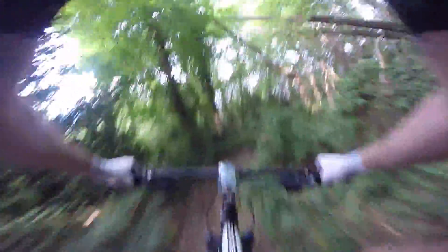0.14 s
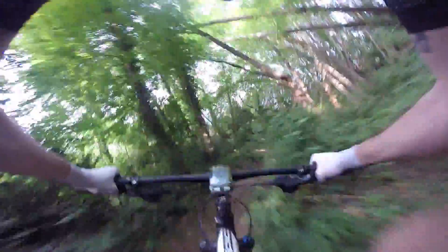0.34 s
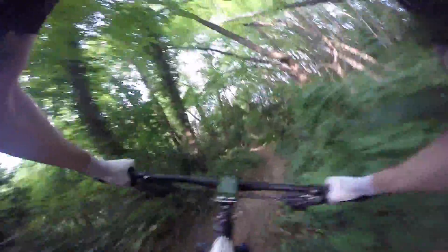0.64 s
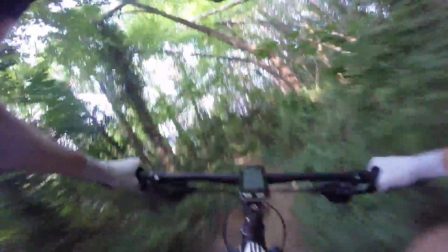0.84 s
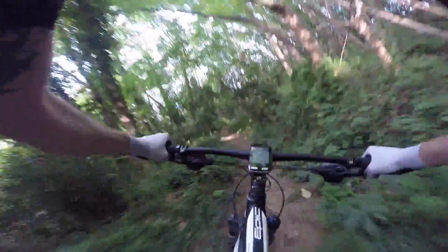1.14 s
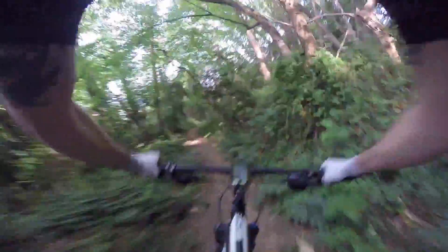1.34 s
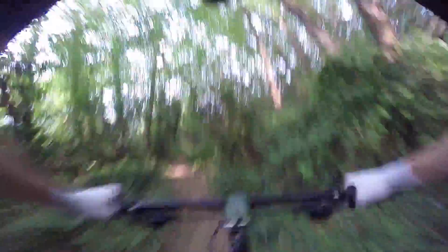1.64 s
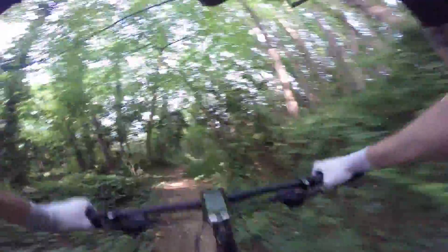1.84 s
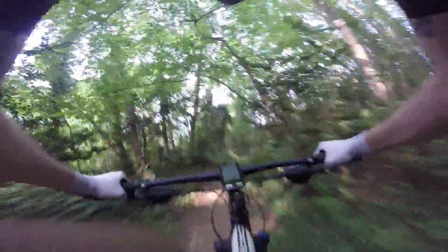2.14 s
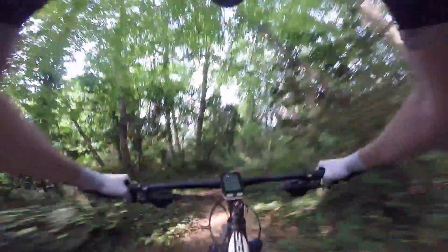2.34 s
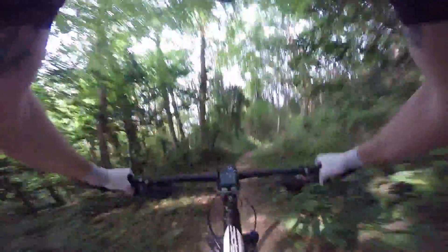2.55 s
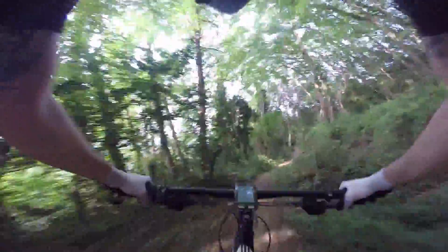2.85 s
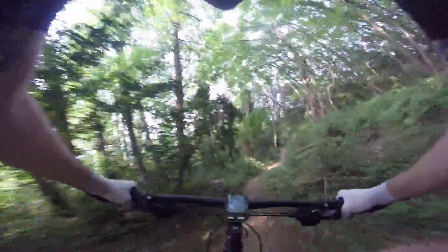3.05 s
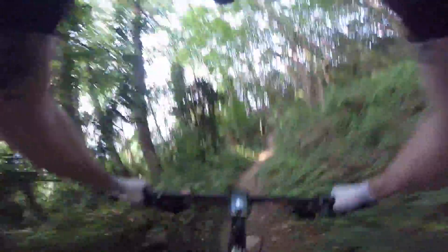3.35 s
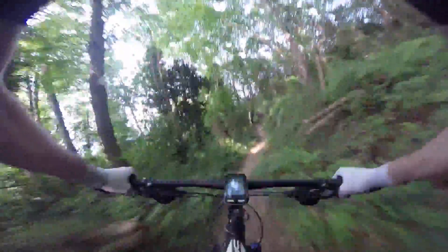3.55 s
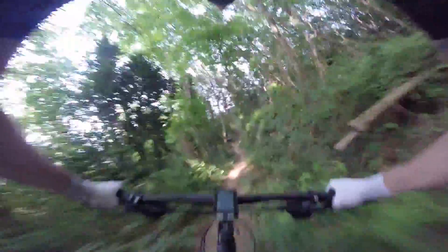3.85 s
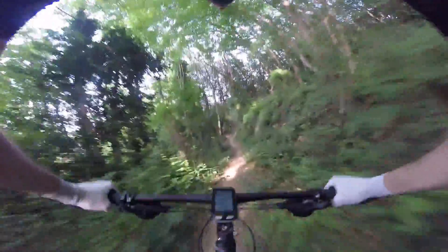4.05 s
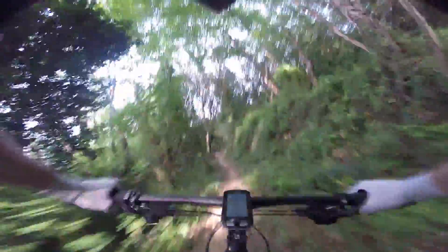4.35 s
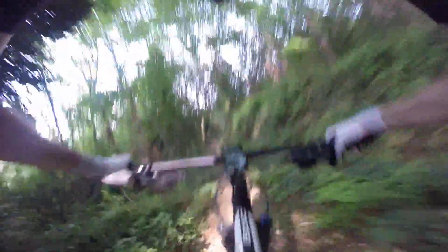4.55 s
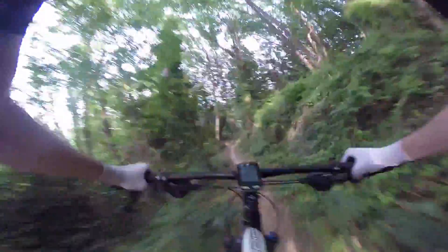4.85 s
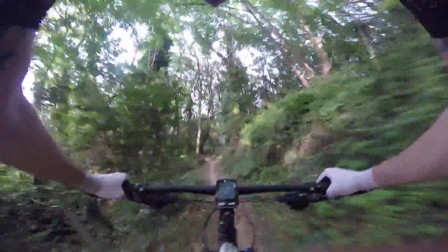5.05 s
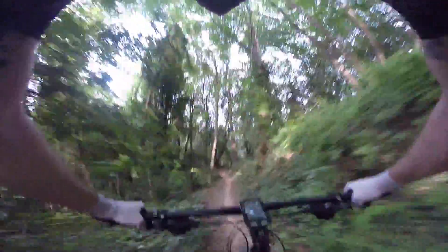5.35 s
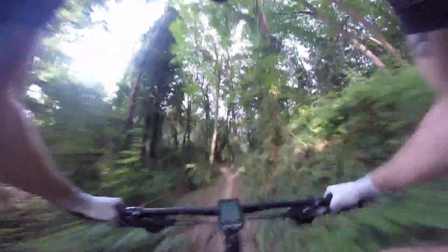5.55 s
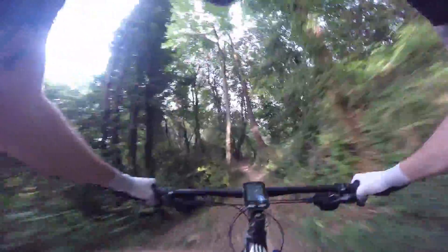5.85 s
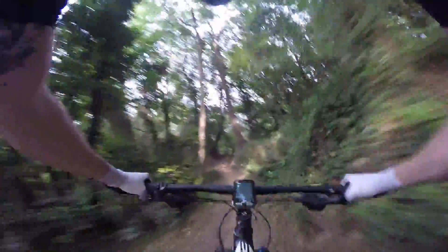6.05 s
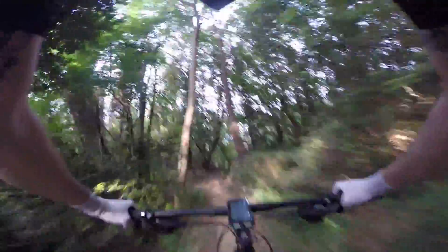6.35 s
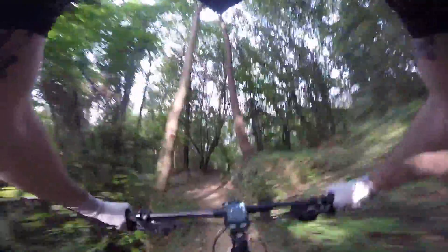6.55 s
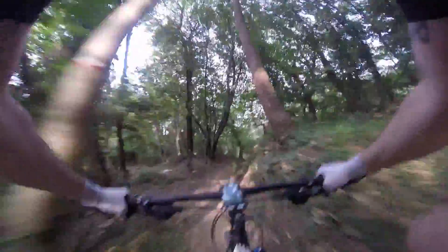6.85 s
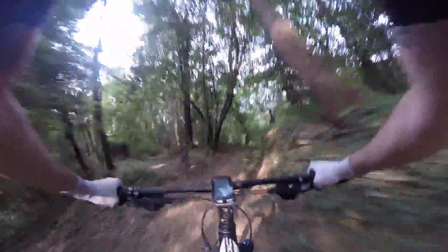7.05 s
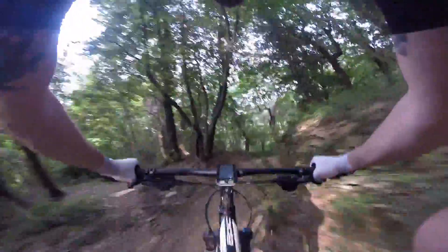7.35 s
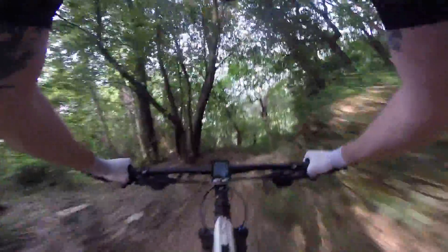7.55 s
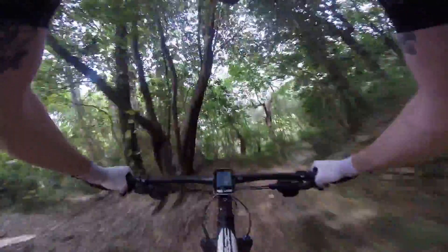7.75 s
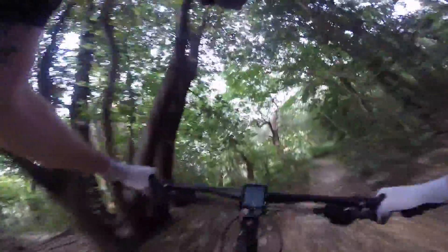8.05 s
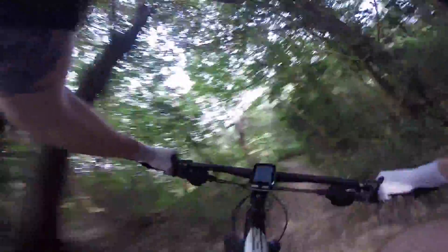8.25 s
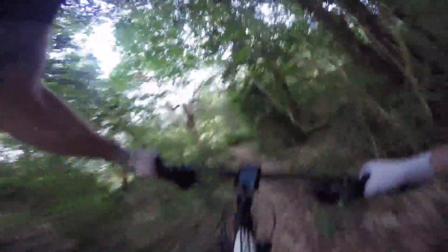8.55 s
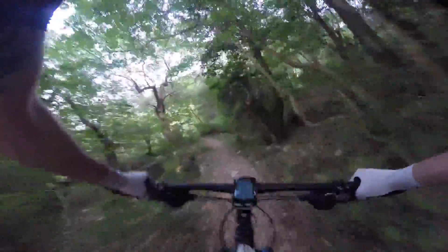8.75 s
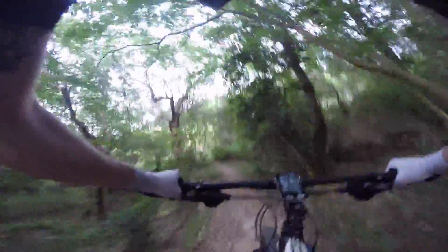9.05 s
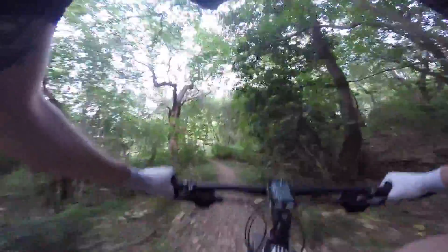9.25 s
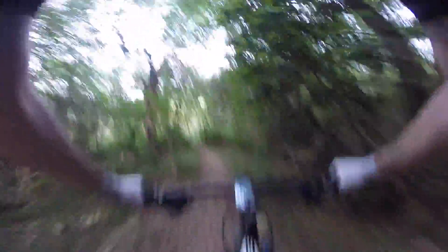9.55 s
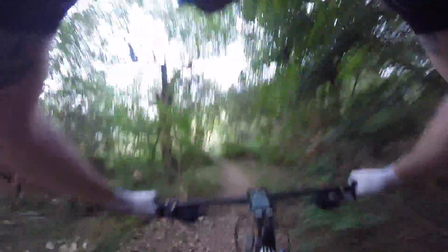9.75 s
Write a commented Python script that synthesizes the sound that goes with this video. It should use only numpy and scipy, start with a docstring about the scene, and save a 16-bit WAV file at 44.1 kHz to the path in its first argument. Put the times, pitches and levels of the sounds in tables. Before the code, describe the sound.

A mountain bike speeds along a rough woodland dirt trail, heard from the rider's chest. Low ground rumble and gusty wind buffet the microphone throughout, over a gritty tyre hiss and hollow roll. Short hollow knocks come irregularly, with sharp plastic ticks and creaks close by, busiest in the first few seconds. The middle turns smoother and windier, then a hard landing clanks the frame near the end.

```python
"""A rough woodland trail, ridden fast on a mountain bike; the microphone is on a mount on the rider's chest.
Wind and ground shake are filtered noise; the tyres rumble and crunch as random clicks and noise through resonances.
The bike knocks and once clanks as short blows ring its modes.
Close to the microphone the plastic mount ticks and creaks as its joints slip."""
import sys
import numpy as np
from scipy import signal
from scipy.io import wavfile
from scipy.ndimage import uniform_filter1d, minimum_filter1d

SR = 44100
rng = np.random.default_rng(int(sys.argv[2]) if len(sys.argv) > 2 else 0)


def generate_wav(sig):
    """Save sig (samples, or channels by samples) to the path in sys.argv[1] as 16-bit PCM at SR."""
    pcm = np.round(np.clip(np.atleast_2d(sig).T, -1, 1) * 32767).astype(np.int16)
    wavfile.write(sys.argv[1], SR, pcm)


N = 437031  # length in samples
CONTROL_STEP = 40  # samples between points of the slow control curves

# All table levels are relative, ahead of the trims in the functions.
# how hard the ground shakes the rider: (time [s], level [dB])
SHAKE = [(0.0, -1.5), (0.02, -19.5), (0.82, -22.5), (1.41, -20), (1.87, -26), (2.43, -18), (4.11, -17),
         (4.44, -24), (4.86, -16.5), (4.97, -18.5), (8.44, -18.5), (8.55, -20), (9.6, -18), (9.91, -20.5)]
# heavy sinks of the bike into a dip: (time [s], rumble level [dB])
HEAVES = [(0.16, -14), (1.05, -11.5), (1.43, -13), (1.95, -33), (2.83, -4.5), (3.52, -7), (4.25, -12),
          (4.669, -7), (4.79, -5), (4.89, -6), (5.45, -17), (5.93, -10), (6.44, -12), (7.66, -18),
          (9.25, -11)]
# brief dips of the low rumble, a negative depth being a lift: (time [s], depth [dB])
LULLS = [(0.52, 3), (0.96, 6), (1.85, 14), (2.67, -5), (4.17, 6), (4.48, 5), (5.53, 12), (5.8, -1.5),
         (6.73, 6), (7.18, 2), (8.58, 12), (9.69, -1)]
# the bike goes light over a crest and the noise drops: (time [s], depth [dB])
CRESTS = [(0.08, 5), (1.6, 7), (1.86, 1.5), (2.03, 9), (2.25, 5.5), (6.31, 7), (6.36, 2), (6.49, 2.5),
          (8.75, 5.5), (8.85, 10)]
HEAVE_S, LULL_S, CREST_S = 0.026, 0.024, 0.022  # half-widths of the bells, at 1/e
SHAKE_GAIN_DB, GUST_RUMBLE_DB = 4, -12  # rumble from the shake and from the gusts
# spectrum of the ground rumble: (frequency [Hz], density [dB per Hz])
RUMBLE_SPECTRUM = [(15, -5), (28, -4.5), (50, -0.5), (85, -2.5), (120, -5), (180, -20), (300, -31.5),
                   (600, -33)]

# gusts at the microphone: (start [s], length [s], level [dB])
GUSTS = [(0.093, 0.32, -13), (0.552, 0.28, -15), (1.03, 0.44, -16.5), (1.393, 0.055, -7.5),
         (2.274, 0.23, -8), (2.61, 0.23, -10), (2.857, 0.35, -6), (3.232, 0.6, -9.5), (3.79, 0.14, -11.5),
         (4.01, 0.049, -10.5), (4.194, 0.64, -13.5), (4.728, 0.051, -14), (4.831, 0.23, -5.5),
         (5.223, 0.1, -9.5), (5.385, 0.41, -6), (5.812, 0.393, -6), (6.52, 0.61, -8.5),
         (7.308, 0.064, -9.5), (7.881, 0.38, -10), (9, 0.39, -6.5), (9.412, 0.23, -15), (9.689, 0.47, -6)]
GUST_ATTACK_S, GUST_SAG_DB_PER_S, GUST_RELEASE_DB_PER_S = 0.06, 15, 215
BREEZE_DB = -1.5  # the air between gusts, relative to the shake
# spectrum of the wind before it brightens: (frequency [Hz], density [dB per Hz])
GUST_SPECTRUM = [(70, -12), (120, 1), (170, 2), (260, -2.5), (400, -8), (600, -15), (1000, -26.5),
                 (1400, -41), (2500, -43), (5000, -104)]

# hollow roll of the tyres on hard ground: (time [s], level [dB])
ROLL_LEVEL = [(0.0, -36), (1.02, -30.5), (1.74, -34), (4.53, -31), (5.11, -37), (5.93, -30.5), (6.4, -35),
              (6.65, -35.5), (7.67, -37), (8.47, -26.5), (8.83, -31.5), (9.19, -30.5), (9.63, -31.5),
              (9.91, -23.5)]
# loose grit under the tyres, thinning out on the packed stretch: (time [s], level [dB])
GRIT_LEVEL = [(0.0, -40.5), (0.58, -42), (0.7, -38.5), (1.3, -40), (1.9, -44), (2.45, -48), (2.87, -50.5),
              (3.3, -50.5), (3.55, -41), (4.1, -43.5), (4.45, -40.5), (5.0, -45), (5.42, -57.5),
              (5.78, -45.5), (6.25, -55.5), (6.75, -51), (6.95, -44.5), (7.7, -42.5), (8.3, -40),
              (8.7, -44.5), (8.86, -42.5), (9.15, -42.5), (9.91, -41)]
ROLL_GAIN_DB, GRIT_GAIN_DB = -1, 2.5  # trims of those two curves
# spectrum of the roll: (frequency [Hz], density [dB per Hz])
ROLL_SPECTRUM = [(300, 6), (500, -6), (800, 6.5), (1080, -1), (1350, -18), (2000, -20.5), (3200, -9.5),
                 (4200, -36.5)]
# spectrum of crushed grit and stones: (frequency [Hz], density [dB per Hz])
GRIT_SPECTRUM = [(1300, 8.5), (1700, 4), (2300, 4.5), (3100, 6), (4300, -3.5), (5200, 1), (6700, -2.5),
                 (8200, -10), (10700, -17.5), (12200, -23.5), (14000, -27), (15500, -38)]
# every knock and creak in the tables marks a bump that presses the tyres into the dirt
LOAD_S, LOAD_ROLL_DB, LOAD_GRIT_DB = 0.005, 5, 5.5
# the tyres bite into the ground with a hollow crunch: (start [s], length [s], level [dB])
BITES = [(0.605, 0.018, -23), (0.648, 0.025, -21.5), (0.868, 0.031, -26), (0.985, 0.051, -23.5),
         (1.544, 0.011, -21.5), (1.885, 0.023, -30.5), (4.427, 0.025, -22), (8.44, 0.041, -26),
         (9.027, 0.034, -23), (9.07, 0.079, -19)]
# the tyres flick up loose dirt: (start [s], length [s], level [dB])
SPRAYS = [(0.605, 0.0032, -28.5), (1.05, 0.076, -35), (2.09, 0.0056, -33), (2.475, 0.016, -39),
          (2.645, 0.011, -33.5), (3.03, 0.013, -35), (3.107, 0.027, -37), (3.265, 0.011, -35),
          (3.525, 0.008, -36), (4.0, 0.034, -35.5), (4.43, 0.034, -32), (4.51, 0.019, -41),
          (5.025, 0.019, -38), (5.14, 0.02, -37), (5.225, 0.017, -37.5), (5.69, 0.02, -35),
          (5.87, 0.021, -45), (5.926, 0.008, -31.5), (6.332, 0.012, -39.5), (6.388, 0.011, -36.5),
          (6.418, 0.031, -42.5), (6.53, 0.028, -38), (6.93, 0.056, -41), (8.3, 0.071, -32.5),
          (8.39, 0.078, -33.5), (8.77, 0.027, -36)]
BURST_ATTACK_S, BURST_RELEASE_S = 0.0018, 0.0014

# single slips of the mount: (time [s], level [dB], favoured pitch [Hz])
TICKS = [(0.017, -25.5, 4080), (0.369, -18.5, 2340), (0.464, -30, 3300), (0.479, -26.5, 2720),
         (0.558, -26, 5030), (0.583, -27.5, 2750), (0.606, -29, 5530), (0.9383, -22.5, 4570),
         (1.137, -22, 2500), (1.3873, -19.5, 4040), (1.394, -21, 4000), (1.4812, -19, 3270),
         (1.4907, -17, 3130), (1.4994, -13, 3270), (1.505, -15, 3280), (1.513, -25, 3400),
         (1.669, -35, 3860), (2.1698, -23.5, 4600), (2.1904, -20, 3100), (2.2787, -22.5, 6340),
         (2.29, -19, 2430), (2.356, -34, 3500), (2.731, -24, 3060), (2.747, -26, 3580), (2.802, -21, 2590),
         (2.8159, -11, 2480), (2.942, -21.5, 2840), (2.955, -27, 2900), (2.9794, -21, 2350),
         (3.3462, -26.5, 3160), (3.4308, -20.5, 2650), (3.496, -26, 2700), (3.5855, -19.5, 4220),
         (4.2057, -12, 2830), (4.267, -21.5, 3300), (4.3957, -26, 4200), (4.441, -21, 3400),
         (4.5616, -17, 3900), (4.731, -20.5, 6400), (4.7626, -26, 2980), (4.8331, -23, 2920),
         (5.779, -34.5, 5500), (6.562, -23.5, 2040), (7.3828, -23.5, 4100), (8.004, -19.5, 2660),
         (8.2563, -26, 3300), (8.278, -24, 3300), (8.2918, -17, 2570), (8.305, -16, 3750),
         (8.334, -29, 3300), (8.396, -34, 3280), (8.412, -22, 3540), (8.43, -23.5, 3300),
         (8.448, -26, 3000), (8.459, -18.5, 3180), (8.47, -25, 3200), (8.486, -21, 4080),
         (8.686, -26, 3850), (8.698, -33, 4450), (8.793, -28, 4500), (8.853, -20, 2540),
         (8.881, -23.5, 2880), (9.052, -21, 3400), (9.081, -21, 2330), (9.1157, -17, 2500),
         (9.1264, -20, 2500)]
# stick-slip runs in the mount: (start [s], length [s], level [dB], slip rate [1/s], favoured pitch [Hz])
CREAKS = [(0.339, 0.015, -21.5, 290, 3140), (0.373, 0.029, -23, 335, 2880), (0.443, 0.013, -28, 240, 3620),
          (0.61, 0.0098, -39, 230, 3500), (0.745, 0.02, -26.5, 370, 2830), (0.866, 0.028, -36, 640, 3100),
          (1.106, 0.11, -26, 116, 2380), (1.289, 0.014, -28.5, 380, 4600), (1.4015, 0.011, -19, 450, 3600),
          (1.4506, 0.017, -16, 265, 3200), (1.473, 0.0043, -13.5, 480, 3260),
          (1.542, 0.007, -19, 680, 3420), (1.657, 0.017, -23.5, 230, 3750),
          (1.705, 0.046, -25.5, 390, 3000), (2.137, 0.022, -25.5, 265, 4030),
          (2.197, 0.023, -26.5, 220, 2960), (2.566, 0.024, -23.5, 520, 3550), (2.696, 0.03, -23, 250, 3000),
          (2.771, 0.014, -21, 430, 2780), (2.914, 0.075, -30.5, 125, 2730), (3.382, 0.052, -27, 157, 3100),
          (3.638, 0.0407, -26, 310, 4000), (4.426, 0.12, -32, 480, 3630), (7.218, 0.026, -28.5, 480, 1800),
          (7.358, 0.016, -32, 230, 4430), (8.312, 0.018, -29, 150, 3460), (9.069, 0.041, -26.5, 300, 2300),
          (9.132, 0.058, -40, 370, 2780), (9.329, 0.1, -30.5, 180, 2330), (9.492, 0.034, -18.5, 121, 2450),
          (9.634, 0.021, -19, 540, 3000), (9.699, 0.014, -18, 760, 2800)]
# resonances of the plastic mount and housing: (frequency [Hz], width [Hz], level [dB])
MOUNT_MODES = [(448, 46, -2.5), (1054, 213, 3.5), (1910, 480, -0.5), (2880, 1070, 2), (3300, 550, -0.5),
               (4380, 730, -10), (5320, 215, -11), (6780, 390, -4.5), (9270, 280, -11), (12000, 740, -12)]

# knocks of the bike over bumps: (time [s], level [dB], favoured pitch [Hz])
KNOCKS = [(0.2143, -12.5, 1280), (0.352, -18, 890), (0.643, -12.5, 1350), (0.922, -19, 550),
          (0.9888, -19.5, 1000), (1.0191, -17, 1040), (1.7936, -12, 1030), (1.9908, -18.5, 1030),
          (2.206, -20, 844), (3.6566, -12.5, 970), (4.204, -15, 1010), (4.3705, -13, 800),
          (4.4277, -20, 1000), (4.6198, -18.5, 1240), (6.046, -13.5, 1620), (6.6078, -11.5, 1100),
          (7.1527, -20, 1300), (7.2416, -16.5, 840), (7.249, -21.5, 1500), (8.4868, -15, 915),
          (8.623, -20, 780), (9.0277, -13.5, 1000), (9.044, -12, 950), (9.4947, -15, 1100),
          (9.638, -19, 1050), (9.699, -24, 1090)]
# resonances of the knocking bike: (frequency [Hz], width [Hz], level [dB])
BIKE_MODES = [(497, 180, -0.5), (800, 245, 5.5), (1050, 220, 3.5), (1556, 600, 6.5), (1780, 310, 2),
              (3090, 520, -11), (5230, 740, -19)]
KNOCK_CHATTER_DB = -30.5  # the loose parts after each knock

# slaps of one hard landing: (time [s], level [dB])
SLAPS = [(8.5378, -19), (8.5402, -10), (8.5465, -18), (8.5815, -26)]
# resonances of the slapped frame: (frequency [Hz], width [Hz], level [dB])
CLANK_MODES = [(466, 28, 2.5), (638, 14, 7.5), (717, 30, -4), (945, 30, -10), (1030, 31, 9.5),
               (2100, 300, -1), (2950, 350, 3), (3430, 250, -2), (4040, 45, -5), (4300, 180, -7)]

GROUND_ECHO_S, GROUND_ECHO_DB = 0.0083, -17  # bike and mount come back off the trail
CUTOFF_HZ = 15600  # top of the microphone's band


def from_db(db):
    """Decibels to an amplitude factor."""
    return 10 ** (np.asarray(db) / 20)


def rms_one(x):
    """Scale to unit power."""
    return x / np.sqrt(np.mean(x ** 2) + 1e-20)


def in_time(rows):
    """Read a (time, level) table at every sample."""
    s, level = np.transpose(rows)
    return np.interp(np.arange(N) / SR, s, level)


def control_times():
    """Times of the control points, in seconds."""
    return np.arange(0, N, CONTROL_STEP) / SR


def every_sample(control):
    """Join control points with straight lines."""
    return np.interp(np.arange(N) / SR, control_times(), control)


def at_hz(points, hz):
    """Read a spectrum on a log-frequency axis."""
    freqs, levels = np.array(points)[:, 0], np.array(points)[:, 1]
    return np.interp(np.log(hz), np.log(freqs), levels)


def add(out, s, sound):
    """Mix a sound in at a given time."""
    i = max(0, int(s * SR))
    out[i:i + len(sound)] += sound[:max(0, N - i)]


def together(*levels_db):
    """Level of unrelated sounds heard at once: their powers add."""
    return 10 * np.log10(sum(from_db(db) ** 2 for db in levels_db) + 1e-12)


def drift(rate_hz):
    """Smooth random wander of spread about 1: noise through a double one-pole low-pass."""
    r = np.exp(-2 * np.pi * rate_hz * CONTROL_STEP / SR)
    noise = rng.standard_normal(N // CONTROL_STEP + 2002)
    slow = signal.lfilter([1], [1, -2 * r, r * r], noise)[2000:]  # drop the filter's start-up
    return np.interp(np.arange(N) / CONTROL_STEP, np.arange(len(slow)), rms_one(slow))


def swells(events, width_s):
    """A bell-shaped swell for each (time, height), summed."""
    t = control_times()
    return every_sample(sum(height * np.exp(-((t - s) / width_s) ** 2) for s, height in events))


def bursts(events):
    """Level in dB of bursts that start quickly, hold and die away."""
    t, power = control_times(), 1e-10
    for start, length, db in events:
        rise = np.clip((t - start) / BURST_ATTACK_S, 0, 1)
        fall = np.exp(-np.maximum(t - start - length, 0) / BURST_RELEASE_S)
        power = power + (rise * fall * from_db(db)) ** 2
    return every_sample(10 * np.log10(power))


def bands(spectrum, sources):
    """Third-octave slices of two sources dealt in turn, weighted by a spectrum: (Hz, signal)."""
    bottom, top = spectrum[0][0], min(spectrum[-1][0] * 1.2, .45 * SR)
    edges = 2 ** np.arange(np.log2(bottom), np.log2(top), 1 / 3)
    for k, (low, high) in enumerate(zip(edges, edges[1:])):
        hz = np.sqrt(low * high)
        sos = signal.butter(2, [low, high], "band", fs=SR, output="sos")
        yield hz, from_db(at_hz(spectrum, hz)) * signal.sosfilt(sos, sources[k % 2])


def even(x, span_s):
    """Hold the power steady over a span, keeping the faster lumps."""
    power = np.abs(uniform_filter1d(x * x, max(2, int(span_s * SR))))
    return x / np.sqrt(power + 1e-12)


def grains(per_s, spread_db):
    """Random clicks of very unequal size, at unit power."""
    sizes = from_db(spread_db * np.minimum(rng.exponential(1, N), 4)) * rng.choice([-1, 1], N)
    return rms_one(sizes * (rng.random(N) < per_s / SR)) + 1e-18


def resonate(x, hz, r):
    """One resonance with pole radius r."""
    w = 2 * np.pi * hz / SR
    return signal.lfilter([1, 0, -1], [1, -2 * r * np.cos(w), r * r], x + 1e-18)


def sing(x, hz, width_hz, gain):
    """Add the narrow ring of a part that the vibration passes through."""
    return x + gain * signal.lfilter(*signal.iirpeak(hz, hz / width_hz, fs=SR), x)


def low_pass(x, hz):
    """Soften the top."""
    return signal.sosfilt(signal.butter(2, min(hz, .45 * SR), fs=SR, output="sos"), x)


def strike(force, modes, scatter, vary_db, spot_hz=3000, focus_db=0):
    """A force rings the modes; the point of contact favours those near one pitch."""
    out = 0
    for k, (hz, width, db) in enumerate(modes):
        mode_hz = hz * np.exp(scatter * rng.normal())
        colour_db = -focus_db * min(abs(np.log2(hz / spot_hz)), 1.5)  # focus is per octave
        gain = from_db(db + colour_db + vary_db * rng.normal())
        out = out + (-1) ** k * gain * resonate(force, mode_hz, np.exp(-np.pi * width / SR))
    return out


def smear(x, hz, width_hz, count=2):
    """Bending waves arrive spread out in time (all-pass), so a hit swells for a cycle or two."""
    r = np.exp(-np.pi * width_hz / SR)
    poles = [1, -2 * r * np.cos(2 * np.pi * hz / SR), r * r]
    return signal.sosfilt([poles[::-1] + poles] * count, x)


def blow(contact_s, chatter_db, chatter_t60):
    """One contact followed by a dying chatter of loose parts."""
    t = np.arange(SR // 5) / SR
    contact = 0.23 * np.exp(-t / contact_s)
    chatter = from_db(chatter_db - 60 * t / chatter_t60)
    force = rng.standard_normal(len(t)) * (contact + chatter)
    force[0] += 1
    return force


def unit_attack(x):
    """Scale a hit to unit power over its first four milliseconds."""
    return x / np.sqrt(np.mean(x[:int(.004 * SR)] ** 2) + 1e-20)


def rumble(level_db):
    """Ground shake and large eddies heave the microphone: low noise held to a level curve."""
    low = sum(band for hz, band in bands(RUMBLE_SPECTRUM, rng.standard_normal((2, N))))
    return from_db(level_db) * even(low, span_s=0.072)


def gust_level():
    """Level in dB of gusts that rise quickly, sag while they last and then collapse."""
    t, power = control_times(), 1e-9
    for start, length, db in GUSTS:
        age = np.maximum(t - start, 0)
        sag_db = GUST_SAG_DB_PER_S * age
        release_db = GUST_RELEASE_DB_PER_S * np.maximum(age - length, 0)
        rise = np.minimum(age / GUST_ATTACK_S, 1)
        power = power + (rise * from_db(db - sag_db - release_db)) ** 2
    return every_sample(10 * np.log10(power))


def wind(gust_db, calm_db=-21.5, pivot_hz=240, brighten=0.15, lumpy_db=2.5, patchy_db=1.05):
    """Stronger gusts shed smaller eddies, so they are brighter; the small eddies come in lumps."""
    lumps, out = drift(60), 0
    for hz, band in bands(GUST_SPECTRUM, rng.standard_normal((2, N))):
        octaves = np.clip(np.log2(hz / pivot_hz), -1, 2)
        tilt_db = brighten * (gust_db - calm_db) * octaves
        lump_db = lumpy_db * lumps * (-0.5 + octaves / 2)
        out = out + band * from_db(tilt_db + lump_db + patchy_db * drift(18.0))
    return from_db(gust_db) * even(out, span_s=0.059)


def tyre_load():
    """Extra load on the tyres, 0-1: it jumps at every listed knock and creak, then eases."""
    t, load = control_times(), 0
    presses = [(s, 0) for s, *_ in KNOCKS] + [row[:2] for row in CREAKS]
    for start, length in presses:
        ease = np.exp(-np.maximum(t - start - length, 0) / LOAD_S)
        load = np.maximum(load, (t >= start) * ease)
    return every_sample(load)


def tyre_roll(roll_db, bumps, bump_db=2.0, patchy_db=3.5):
    """Tyre knobs drum on the ground as random clicks; small bumps pulse them and a wheel part rings faintly."""
    knobs = [grains(per_s=1500, spread_db=2.5) for k in range(2)]
    roll = sum(band * from_db(patchy_db * drift(8.7)) for hz, band in bands(ROLL_SPECTRUM, knobs))
    roll = even(sing(roll, hz=1029, width_hz=75, gain=1.0), span_s=0.023)
    return roll * from_db(bump_db * bumps) * from_db(roll_db)


def tyre_grit(grit_db, bumps, patchy_db=4.0, brighten=0.058, mean_grit_db=-38):
    """Fine dirt hisses evenly and larger crumbs crack; harder crushing sounds brighter."""
    crumbs = np.array([grains(per_s=3500, spread_db=2.8) for k in range(2)])
    crunch = crumbs + .5 * rng.standard_normal((2, N))
    tilt_db = brighten * (grit_db - mean_grit_db)
    grit = 0
    for hz, band in bands(GRIT_SPECTRUM, crunch):
        octaves = max(np.log2(hz / 4000), 0)
        grit = grit + band * from_db(patchy_db * drift(42) + tilt_db * octaves)
    grit = sing(grit, hz=2878, width_hz=22, gain=1.2)
    grit = sing(grit, hz=6800, width_hz=560, gain=0.33)
    grit = sing(grit, hz=12200, width_hz=630, gain=.7)
    return rms_one(grit) * from_db(bumps) * from_db(grit_db)


def stones(grit_db, per_s=600, spread_db=3.5, cycles=17, level_db=-1.5, clump_db=5.5, count=24):
    """Small clusters of stones click together under the tyres, dealt among resonances of set pitch."""
    clicks = grains(per_s, spread_db) * from_db(clump_db * drift(45))
    dealt, out = rng.integers(0, count, N), 0
    for k, hz in enumerate(np.geomspace(1300, 8000, count)):
        r = from_db(-60 * hz / (cycles * SR))  # each click falls 60 dB in this many cycles
        out = out + from_db(at_hz(GRIT_SPECTRUM, hz)) * hz * resonate(clicks * (dealt == k), hz, r)
    return rms_one(out) * from_db(grit_db + level_db)


def slip(force, hz, focus_db, vary_db=1.5, width_hz=1700):
    """The mount's modes ring around one favoured pitch, slightly spread in time."""
    ring = strike(force, MOUNT_MODES, scatter=0.051, vary_db=vary_db, spot_hz=hz, focus_db=focus_db)
    return smear(ring, hz, width_hz)


def faint_creaks(grit_db, per_s=14, level_db=12.0, spread_db=1.5, focus_db=12, soft_hz=6500, fade_db=11.0):
    """Faint random creaks of the mount: short dying runs of ticks, louder with the grit."""
    out = np.zeros(N)
    for i in np.flatnonzero(rng.random(N) < per_s / SR):
        force = np.zeros(SR // 10)
        touches = np.cumsum(rng.uniform(.002, .012, rng.integers(1, 6)))
        places = ((touches - touches[0]) * SR).astype(int)
        force[places] = from_db(-fade_db * np.arange(len(touches)))
        run = slip(force, hz=3400 * 2 ** rng.uniform(-0.88, 1.0), focus_db=focus_db)
        db = grit_db[i] + level_db + spread_db * np.clip(rng.normal(), -2, 2)
        add(out, i / SR, unit_attack(low_pass(run, soft_hz)) * from_db(db))
    return out


def mount_ticks(trim_db=0.5, reach=2.17, focus_db=10):
    """Plastic joints slip once: a sharp contact rings the mount."""
    out = np.zeros(N)
    for s, db, hz in TICKS:
        force = blow(contact_s=.00015, chatter_db=-33, chatter_t60=.028)
        tick = low_pass(slip(force, hz, focus_db), min(reach * hz, 7500))
        add(out, s, from_db(db + trim_db) * unit_attack(tick))
    return out


def mount_creaks(focus_db=10):
    """Plastic joints stick and slip in nearly even trains, which creak."""
    out = np.zeros(N)
    for start, span, db, per_s, hz in CREAKS:
        slips = np.cumsum(np.exp(.12 * rng.normal(size=80))) / per_s
        slips = slips[slips - slips[0] < span] - slips[0]
        creak = np.zeros(int(span * SR) + SR // 50)
        # successive slips grip at slightly different points, so their colour varies
        for part in (slips[0::2], slips[1::2]):
            force = np.zeros(len(creak))
            force[(part * SR).astype(int)] = from_db(1.8 * rng.normal(size=len(part)))
            decay = np.exp(-1 / (.0007 * SR))
            scrape = signal.lfilter([1], [1, -decay], force) * rng.standard_normal(len(force))
            creak += slip(force + 0.09 * scrape, hz, focus_db)
        creak = low_pass(creak, hz=8300)
        power = np.sum(creak ** 2) / (span * SR)
        add(out, start, from_db(db) * creak / np.sqrt(power))
    return out


def knocks(reach=5.6, focus_db=9):
    """Short hollow blows through the frame, each with its own pitch and a brief chatter."""
    out = np.zeros(N)
    for s, db, hz in KNOCKS:
        force = blow(contact_s=.00006, chatter_db=KNOCK_CHATTER_DB, chatter_t60=.08)
        hit = strike(force, BIKE_MODES, scatter=0.025, vary_db=2.0, spot_hz=hz, focus_db=focus_db)
        hit = smear(low_pass(hit, reach * hz), hz, width_hz=960, count=1)
        add(out, s, from_db(db) * unit_attack(hit))
    return out


def clank():
    """A quick flurry of slaps sets the frame ringing; its narrowest modes last longest."""
    out = np.zeros(N)
    for s, db in SLAPS:
        force = blow(contact_s=.00008, chatter_db=-34, chatter_t60=.12)
        ring = strike(force, CLANK_MODES, scatter=.008, vary_db=1.5)
        add(out, s, from_db(db) * unit_attack(smear(ring, hz=2500, width_hz=1300)))
    return out


def with_ground(x):
    """Add the short, softened reflection from the trail."""
    out = x.copy()
    add(out, GROUND_ECHO_S, from_db(GROUND_ECHO_DB) * low_pass(x, hz=6000))
    return out


def scene():
    """Wind and tyres under the knocking bike and the creaking mount, as heard at the rider's chest."""
    shake_db, roll_db, grit_db = in_time(SHAKE), in_time(ROLL_LEVEL), in_time(GRIT_LEVEL)
    light_db, load = swells(CRESTS, CREST_S), tyre_load()

    gust_db = together(gust_level(), shake_db + BREEZE_DB) - light_db
    heaves = swells([(s, from_db(db)) for s, db in HEAVES], HEAVE_S)
    heave_db = 20 * np.log10(heaves + 1e-9)
    shaken_db = shake_db + SHAKE_GAIN_DB - light_db
    rumble_db = together(shaken_db, gust_db + GUST_RUMBLE_DB, heave_db) - swells(LULLS, LULL_S)
    # jolts of the rider's body swell and drop rumble and wind together
    jolts = from_db(1.5 * drift(7))
    air = jolts * (from_db(-3.0) * rumble(rumble_db) + from_db(-5.5) * wind(gust_db))

    pressed_roll_db = roll_db + ROLL_GAIN_DB + LOAD_ROLL_DB * load - light_db / 2
    pressed_grit_db = grit_db + GRIT_GAIN_DB + LOAD_GRIT_DB * load - light_db / 2
    rolling_db = together(pressed_roll_db, bursts(BITES))
    crushing_db = together(pressed_grit_db, bursts(SPRAYS))
    bumps = 1.6 * drift(30)  # small bumps pulse roll and grit together
    ground = tyre_roll(rolling_db, bumps) + tyre_grit(crushing_db, bumps) + stones(crushing_db)

    mount = faint_creaks(grit_db) + mount_ticks() + mount_creaks()
    bike = knocks() + clank()
    return (air + ground + with_ground(mount + bike))[None]


def record(dry):
    """At the microphone a fast limiter holds the largest peaks and the top is cut."""
    allowed = np.minimum(1, .9 / (np.abs(dry) + 1e-9))
    gain = uniform_filter1d(minimum_filter1d(allowed, size=101), size=101)
    top_cut = signal.ellip(10, .2, 80, CUTOFF_HZ, fs=SR, output="sos")
    return signal.sosfilt(top_cut, dry * gain)


dry = scene()
out = record(dry)
generate_wav(out)
```